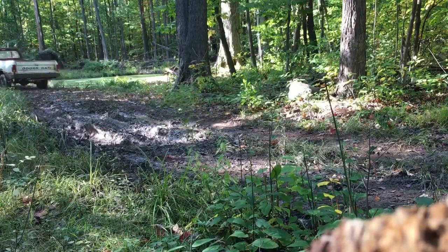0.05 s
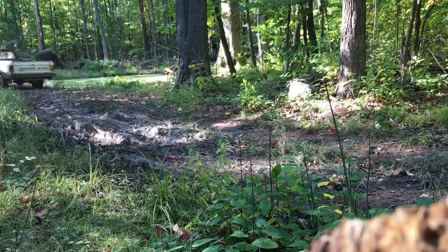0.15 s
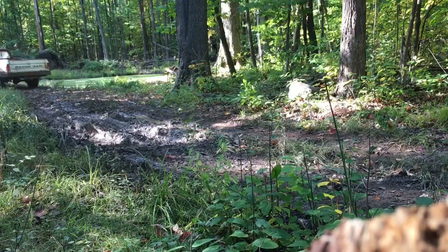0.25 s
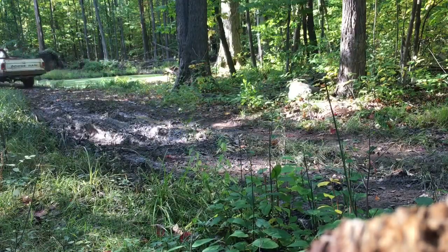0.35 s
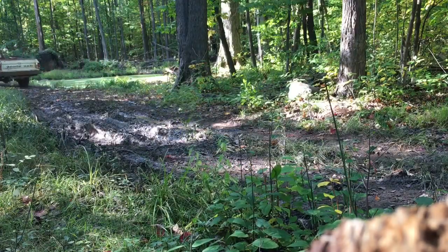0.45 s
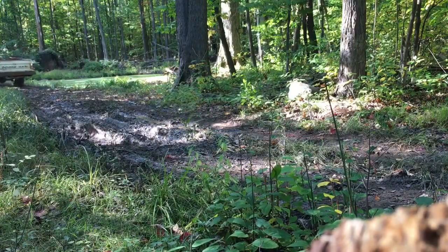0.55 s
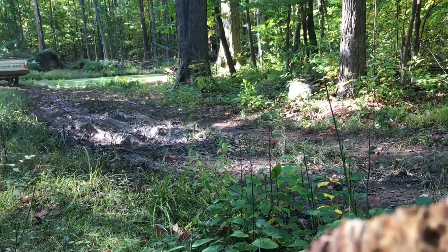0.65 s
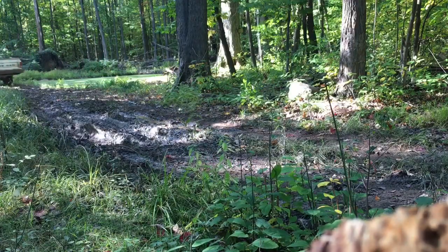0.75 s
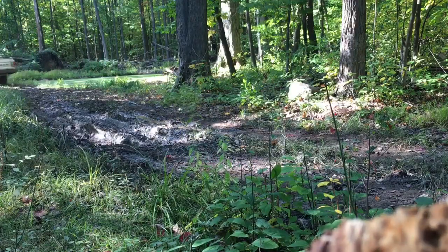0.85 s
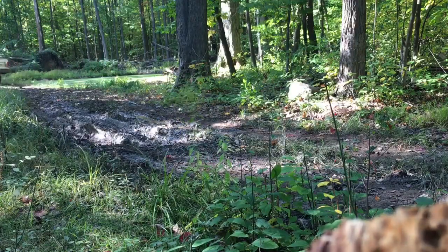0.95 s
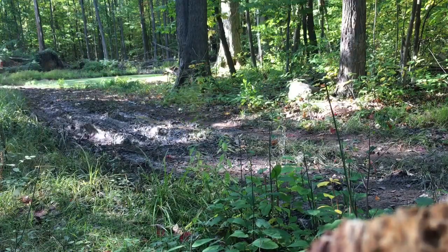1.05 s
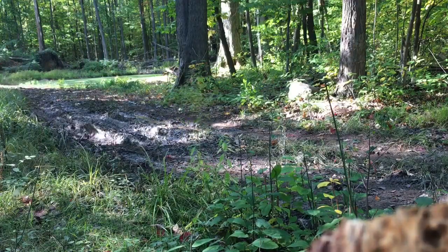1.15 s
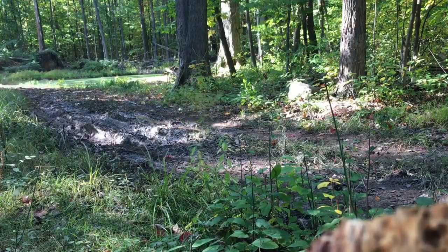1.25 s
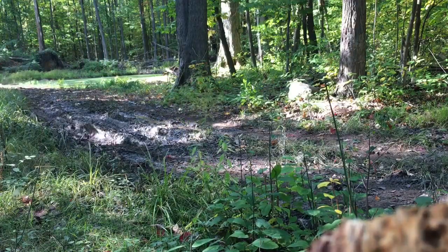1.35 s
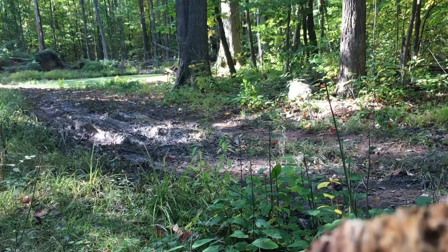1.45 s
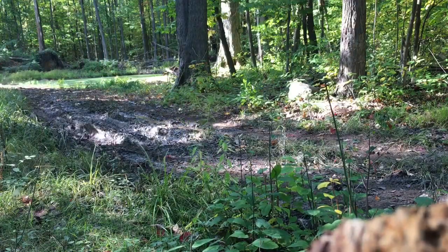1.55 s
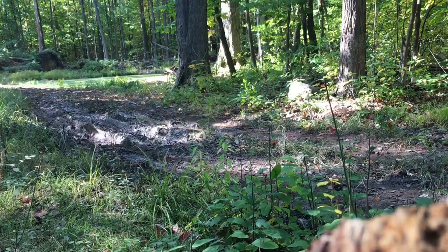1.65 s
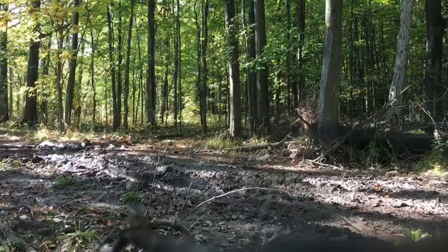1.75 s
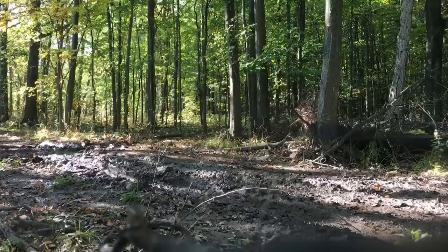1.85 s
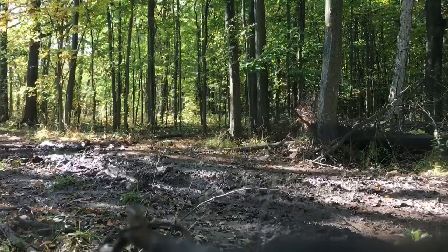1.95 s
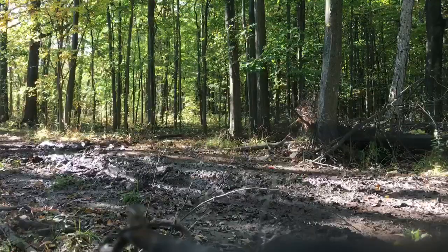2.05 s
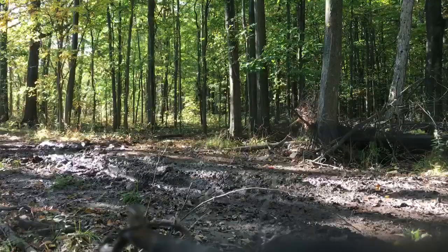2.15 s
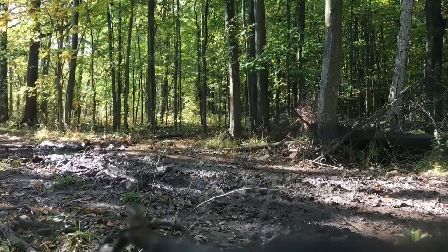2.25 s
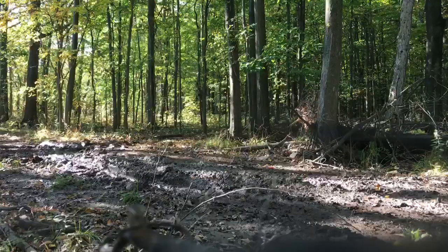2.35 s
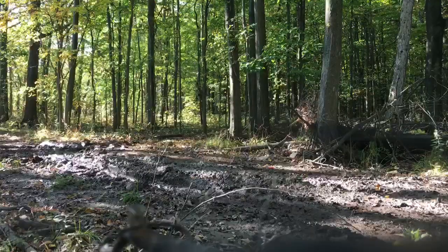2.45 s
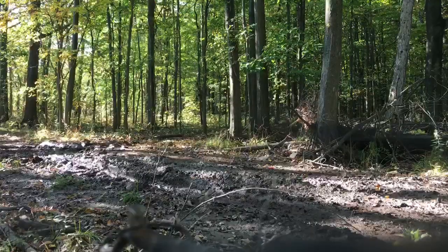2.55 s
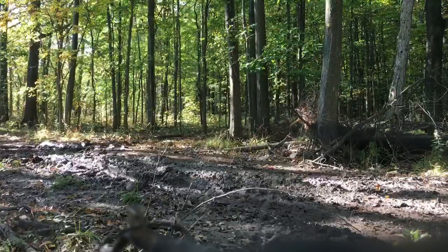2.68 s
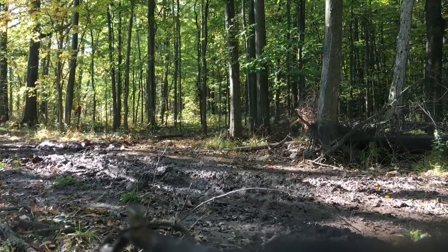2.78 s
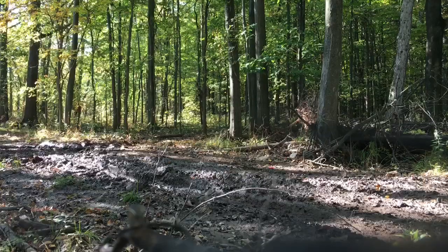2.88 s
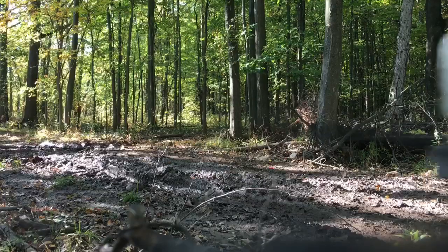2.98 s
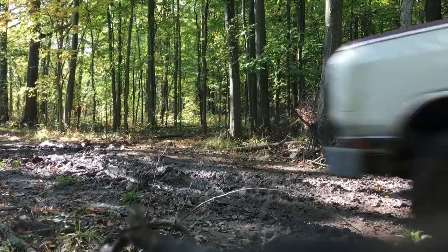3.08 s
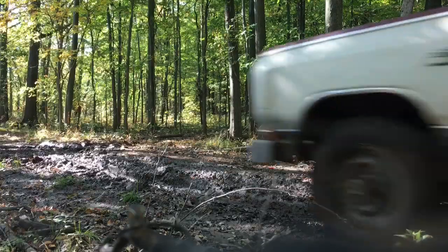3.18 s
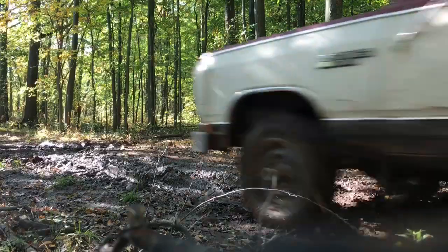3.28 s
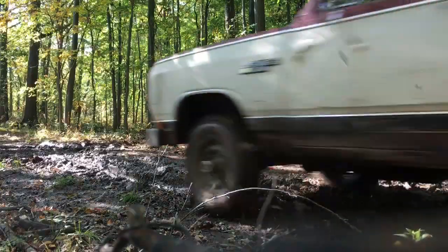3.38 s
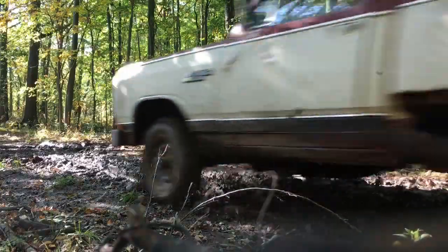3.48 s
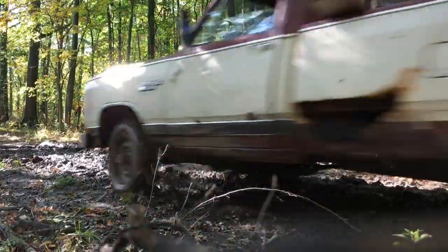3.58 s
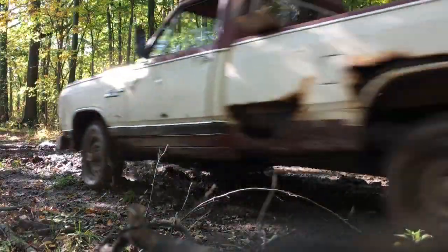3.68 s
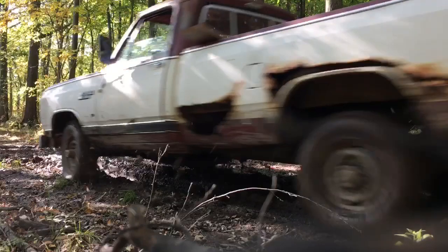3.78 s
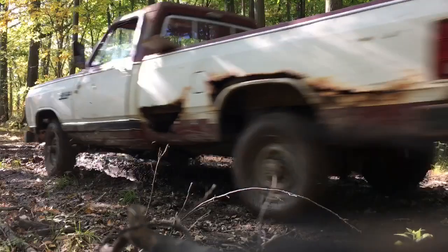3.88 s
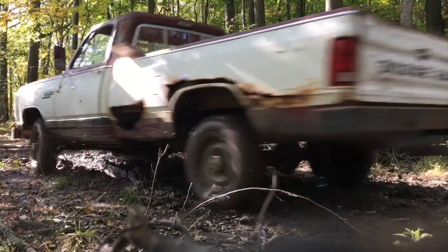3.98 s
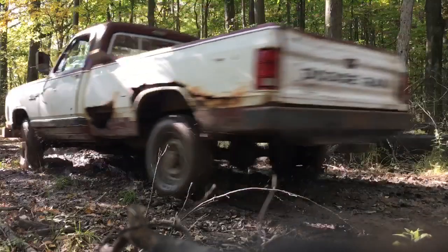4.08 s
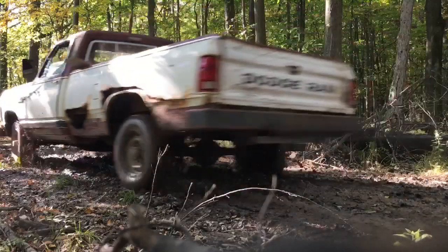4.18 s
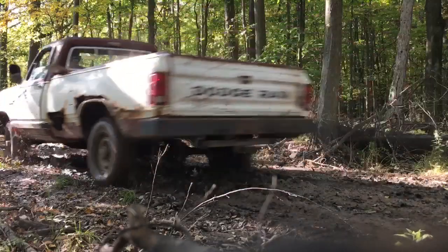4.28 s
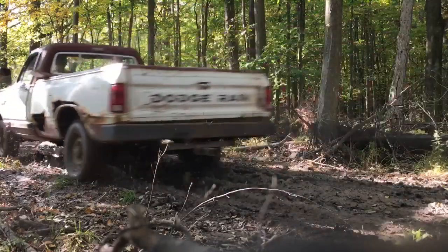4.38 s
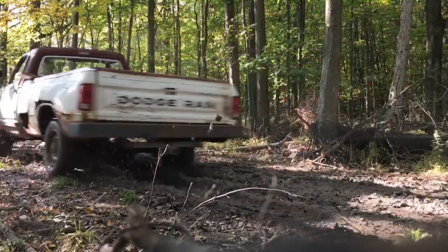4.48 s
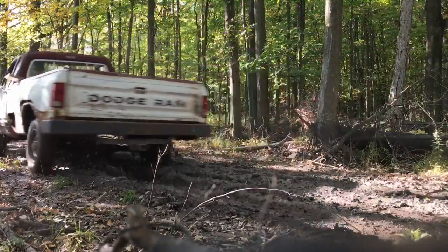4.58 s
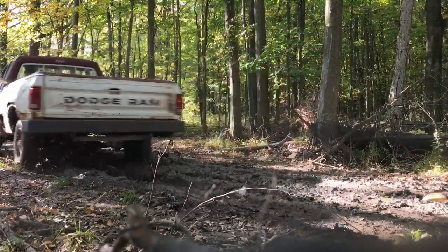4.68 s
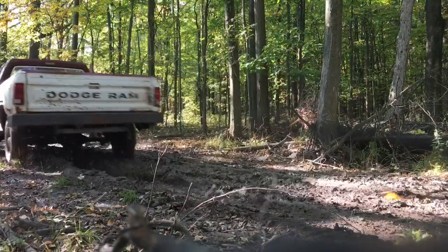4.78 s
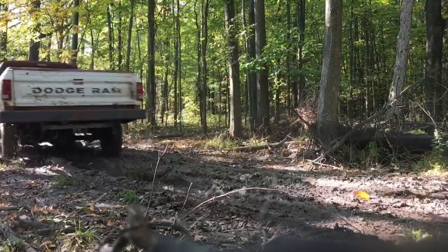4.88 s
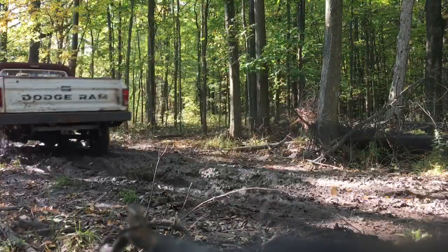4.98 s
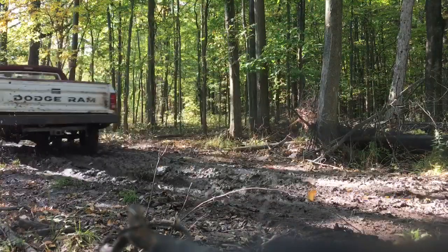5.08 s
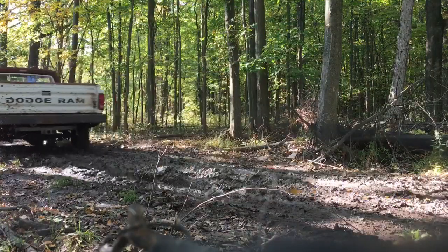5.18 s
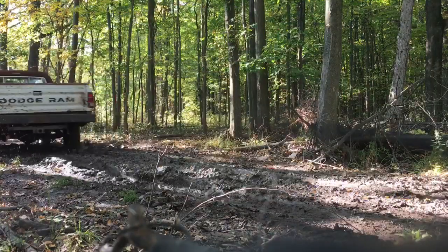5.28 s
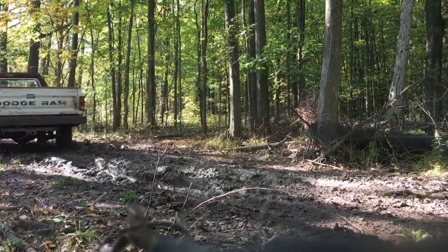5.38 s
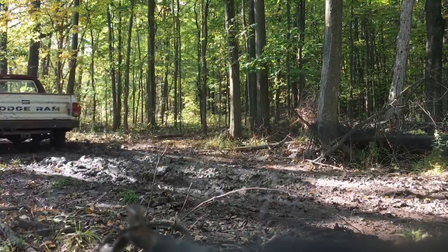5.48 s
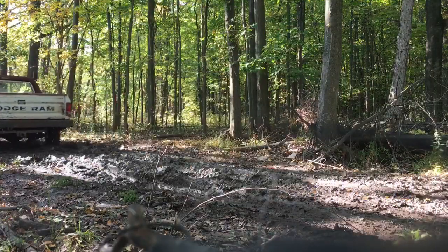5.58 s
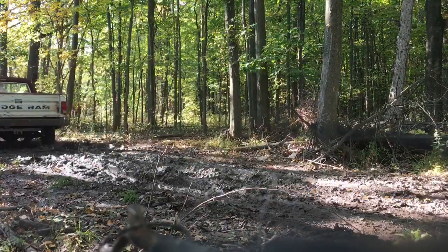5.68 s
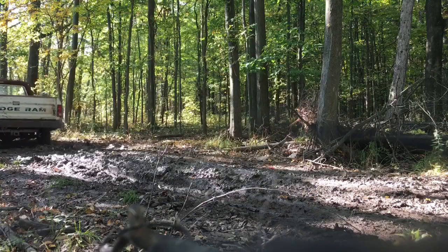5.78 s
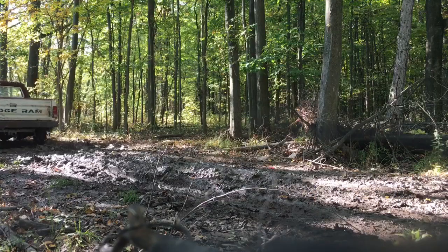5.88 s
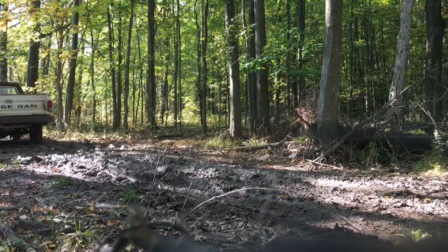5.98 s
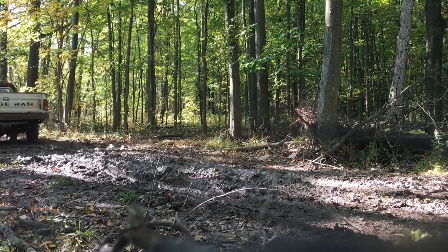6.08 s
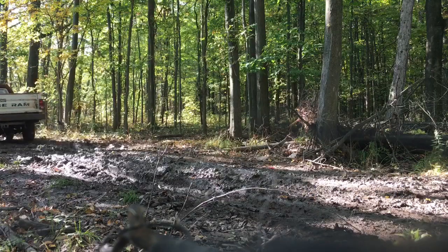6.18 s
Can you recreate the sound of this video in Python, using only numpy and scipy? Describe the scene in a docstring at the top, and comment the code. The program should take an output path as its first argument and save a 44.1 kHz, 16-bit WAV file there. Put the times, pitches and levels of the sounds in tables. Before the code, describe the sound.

Starting abruptly mid-rev, a distant old truck engine drones, surges and coasts down in soft woodland air. After a tiny dropout it is near, steady and throbbing, and grows quickly into a loud close pass with broad airy rush and puffing exhaust leak. The brightness falls away as it leaves, revving high and buzzing, with a short stumble near the end. Small knocks, mud pops and snapping twigs; fixed single microphone close to the ground.

```python
"""A muddy woodland track, along which an old V8 pickup churns.
Far off, its revs surge and coast; after a short dropout it draws near, passes close and pulls away.
The exhaust lopes on harmonics of the engine cycle over a noisy burble, and a leaking manifold spits in puffs.
Shaped noise makes the rush of fan and engine bay, sparse pops the crackling mud,
and short noise bursts the knocks and snapping twigs; soft noise is the wash of the woods."""
import sys
import numpy as np
from scipy import signal
from scipy.fft import rfft, irfft, next_fast_len
from scipy.io import wavfile
from scipy.ndimage import uniform_filter1d

SR = 44100
rng = np.random.default_rng(int(sys.argv[2]) if len(sys.argv) > 2 else 0)


def dump(signal):
    """Clip the signal to [-1, 1] and save it as 16-bit WAV at the path in sys.argv[1]."""
    limited = np.clip(np.atleast_2d(signal).T, -1, 1)
    pcm = np.round(limited * 32767).astype(np.int16)
    wavfile.write(sys.argv[1], SR, pcm)


N = 274724
TIME = np.arange(N) / SR

# Tailpipe tone from five sides. Each row: multiple of the engine cycle, then relative level in dB
# far off, nearing, beside, leaving and easing off.
TAILPIPE_ORDERS = [(2, -39, -37, -24, -11.5, -14), (3, -23, -22, -1.5, 0.5, -3),
                   (4, -21, -15, -12, -7.5, -2.5), (5, -11, 2.5, -4, -6.5, -3.5),
                   (6, -20, -23, -17, -3, -0.5), (7, -24, -19, -25, -20, -16), (8, 0, -2, 0, -6, 0),
                   (9, -20, -19, -26, -17.5, -13), (10, -17, -15, -25, -12, -12.5),
                   (11, -12, -14, -5, -8, -5), (12, -22, -28, -19, -28, -14.5),
                   (13, -12.5, -11, -5.5, -13, -9), (14, -26, -24, -20, -23, -23),
                   (15, -33, -16, -29, -29, -34), (16, -29.5, -23, -10, -27, -26),
                   (17, -34, -23, -29, -22, -28), (18, -40, -22, -25, -31, -33),
                   (19, -28, -21, -16, -30, -17), (20, -40, -29, -33, -28, -24),
                   (21, -38, -24, -25, -36, -23), (22, -41, -29, -36, -25, -37),
                   (23, -40, -33, -35, -35, -36), (24, -33, -27, -29, -33, -34)]
# Which of those sides is heard. Each row: time in seconds, side 0-4 in the order above.
SIDE_HEARD = [(.18, 4), (.25, 0), (.45, 0), (.53, 4), (.6, 4), (.68, 0), (1.69, 0), (1.71, 1), (3.05, 1),
              (3.5, 2), (3.85, 2), (4.25, 3), (5.7, 3), (5.9, 4)]
# Multiples that hold firm; the ones between them waver more.
FIRM_ORDERS = (3, 5, 8, 11, 13, 16)
# Cylinders of the leaking bank. Each row: place in the engine cycle 0-1, relative strength of the spit.
LEAKING_BANK = [(.02, .15), (.225, 1.0), (.6, .95), (.865, .85)]
# How directly the leak is heard. Each row: time in seconds, share 0-1.
LEAK_IN_VIEW = [(0, .2), (1.7, .1), (2.2, .25), (2.45, .75), (3.3, .75), (3.7, .5), (4.1, .25), (6.2, .2)]
# How open the front wheel arch lies to the listener. Each row: time in seconds, share 0-1.
ARCH_OPENNESS = [(2.7, .02), (3.15, .12), (3.35, .42), (3.7, .6), (3.82, .25), (4.1, .03)]

# Noise colours. Each row: frequency in Hz, relative level in dB per Hz.
BURBLE_COLOUR = [(20, -42), (38, -22), (58, -3), (90, -3), (150, 0.5), (210, -4.5), (300, -13.5),
                 (420, -21), (700, -40.5), (1500, -77)]
FAN_COLOUR = [(150, -19.5), (340, 2), (450, 1), (520, -2.5), (640, 1), (760, -1), (890, 1.5), (1080, -1.5),
              (1300, -4.5), (1600, -15), (3000, -42)]
# Fan roar from far off; each row as above.
FAR_FAN_COLOUR = [(200, -10), (340, 2), (500, 1.5), (620, -.5), (780, -5), (1000, -8), (1300, -8),
                  (1700, -14), (3000, -45)]
# Engine bay heard from the front, then from the rear; each row as above.
BAY_FRONT_COLOUR = [(900, -30), (1350, -6), (1540, 0), (1750, -1), (1950, -5.5), (2320, 0), (2650, -4),
                    (2900, -2), (3350, -4), (3650, -4), (4050, -7.5), (4800, -8.5), (5600, -15),
                    (8000, -55)]
BAY_REAR_COLOUR = [(900, -34), (1350, -3), (1600, 2), (2000, -2), (2300, -0.5), (2700, -1.5), (3100, -1),
                   (3700, -3), (4100, -6.5), (4900, -10), (5600, -17.5), (8000, -57)]
# Manifold hiss and still forest; each row as above.
HISS_COLOUR = [(3500, -42), (4900, -6), (5500, -1.5), (6500, -2), (7500, -6), (8900, -5), (9900, -8),
               (10450, -14), (11300, -8), (13000, -12.5), (15700, -15.5)]
FOREST_COLOUR = [(30, 0), (100, 6), (400, 2), (800, -2), (1600, -5), (3000, -11), (5000, -17), (8000, -26),
                 (15000, -41)]
# Soft ground swallows the distant upper exhaust. Each row: frequency in Hz, gain in dB.
GROUND_RESPONSE = [(30, -5), (60, 0), (200, .6), (270, -1), (330, -1), (420, -3.5), (550, -3), (900, 0)]
# Resonances under the bonnet. Each row: frequency in Hz, width in Hz, relative level in dB.
BONNET_RINGS = [(875, 55, -6), (2153, 90, -3), (2342, 90, 1), (2518, 70, -1), (2850, 200, 0),
                (3200, 250, -4), (3620, 150, -3.5), (4600, 200, -10)]
# The firing note booms on pipe resonances. Each row: frequency in Hz, half width in Hz, boost in dB.
PIPE_BOOMS = [(135.6, 3, 6.3), (171, 4.5, 3.5)]

# Body knocks and clods. Each row: start in seconds, level in dB, centre of the ring in Hz,
# time to die by 60 dB in seconds.
KNOCKS = [(.075, -29, 400, .45), (.13, -31, 1100, .25), (.283, -33, 2600, .12), (.79, -42, 600, .2),
          (3.755, -24, 2800, .25), (4.428, -24, 2100, .04), (4.96, -32, 1000, .2), (5.6, -19, 150, .3),
          (5.812, -27, 560, .35), (6.09, -32, 1100, .14)]
# Snapping twigs. Each row: start in seconds, relative level in dB.
TWIG_SNAPS = [(0.2714, -35), (0.844, -40), (2.3396, -23.5), (4.9127, -30), (5.0794, -29), (5.2144, -29),
              (5.8127, -31), (5.9279, -27), (6.0751, -27)]

# Crankshaft speed far off, then on the way past. Each row: time in seconds, revolutions per minute.
SPEED_FAR = [(0.0, 2149), (0.13, 1970), (0.17, 1976), (0.21, 2415), (0.4, 2411), (0.58, 2416), (0.69, 2268),
             (0.76, 2106), (0.85, 2023), (1.12, 2178), (1.23, 1884), (1.42, 1674), (1.68, 1534)]
SPEED_NEAR = [(1.72, 1824), (1.89, 1765), (2.12, 1862), (2.5, 1820), (2.91, 2007), (3.2, 2079),
              (3.65, 2470), (3.97, 2830), (4.15, 2876), (4.65, 2953), (4.8, 2892), (4.93, 3000),
              (5.16, 2939), (5.43, 2987), (5.68, 2836), (5.87, 2581), (6.0, 2518), (6.23, 2701)]
# Presses of the pedal far off. Each row: start in seconds, release in seconds, depth 0-1.
PEDAL_PRESSES = [(-.2, .2, .85), (.21, .62, 1.0), (.85, 1.05, .95)]
# The throttle snaps shut and the exhaust falters. Each row: time in seconds, depth in dB, half width in seconds.
THROTTLE_LIFTS = [(.695, 10, .022), (.82, 3, .02), (1.15, 5.5, .032), (1.668, 6, .03)]
# The tyres dig into soft mud. Each row: start in seconds, end in seconds, extra firing note in dB,
# extra roar and rush in dB.
MUD_DIGS = [(.06, .12, 0, 5.5), (3.96, 4.02, 2.5, 2.5), (4.92, 5.6, 0, 3), (5.86, 5.93, 6.5, 1.5),
            (6.06, 6.2, 1.5, 3)]
# Bark and rush sink as the engine drops its revs: time in seconds, depth in dB, half width in seconds.
REV_LULL = (5.775, 3.5, .04)
# The firing splutters at the gear change: time in seconds, depth in dB, half width in seconds.
GEAR_STUMBLE = (5.76, 6, .05)
# Base layer levels far off. Each row: coasting in dB, gain at full throttle in dB,
# change while easing off in dB, gain in dB per rpm above cruising.
FAR_LEVELS = {"lope": (-38, 9.5, 3.5, -.001), "firing": (-28, 6, -5.5, .007),
              "bark": (-33.2, 3.6, .5, .0085), "burble": (-32, .5, 1.5, .003), "fan": (-53, 12, 0, .001),
              "bay": (-56, 14.5, .5, -.001), "hiss": (-66, 17.5, 2, -.002)}
# Base layer levels on the way past. Each row: before, beside and after in dB, arrival in seconds,
# swell time in seconds, start of leaving in seconds, fade time in seconds.
PASS_LEVELS = {"lope": (-21, -13.7, -19, 2.4, .28, 3.45, .25),
               "firing": (-23.8, -17.6, -29.5, 2.58, .22, 4.06, .06),
               "bark": (-25.5, -15.4, -29.2, 2.75, .27, 3.55, .55),
               "burble": (-28.8, -24.2, -25.2, 2.65, .1, 3.4, .2),
               "fan": (-37.5, -29.5, -36, 2.55, .12, 3.6, .15),
               "bay": (-39.2, -21, -39.5, 2.74, .16, 3.7, .26),
               "hiss": (-46.7, -28.3, -48.3, 2.53, .15, 3.55, .38)}

DROPOUT_S, EDGE_HZ, CRUISING_RPM = 1.699, 15730, 2000
PRESS_S, RELEASE_S = .018, .17  # time constants of the pedal
FAR_OFF = TIME < DROPOUT_S


def exhaust(cycles, uneven_db=.7, splutter_share=.5):
    """Tailpipe and burble, heard first over a long stretch of soft ground, then from close by."""
    falter_db = sum(bump(TIME, *lift) for lift in THROTTLE_LIFTS)
    stumble_db = bump(TIME, *GEAR_STUMBLE)
    # under load in the mud the strength of the firing keeps changing
    strength_db = uneven_db * ~FAR_OFF * drift(60)
    # in the stumble the tone sinks while the noise swells
    tone = tailpipe(cycles) * gain_of(-stumble_db)
    splutter = burble(cycles) * gain_of(splutter_share * stumble_db)
    pipe = (tone + splutter) * gain_of(strength_db - falter_db)
    return np.where(FAR_OFF, filtered(pipe, GROUND_RESPONSE), pipe)


def tailpipe(cycles, waver_db=.8, loose_waver_db=1.8, jitter_cycles=.0018, lag_cycles=.17,
             far_smear=.17, front_smear=.12, rear_smear=.03):
    """Orders of the engine cycle; the uneven beat of one bank sets their phases and makes the lope."""
    coarse_time = TIME[::128]
    orders, *sides = np.transpose(TAILPIPE_ORDERS)
    s, side = np.transpose(SIDE_HEARD)
    side_db = sum(np.outer(db, np.interp(coarse_time, s, side == k)) for k, db in enumerate(sides))
    size = gain_of(side_db)
    # order 8 is the firing note: lope below it, bark above it
    group = np.sign(orders - 8).astype(int) + 1
    for k, db in enumerate(exhaust_levels()):
        members = group == k
        size[members] *= gain_of(np.interp(coarse_time, TIME, db)) / np.linalg.norm(size[members], axis=0)
    firing_places = np.array([0, 2, 5, 7]) / 8  # one bank, in cycles
    turns = cycles + jitter_cycles * drift(70) - lag_cycles
    # many paths through the trees delay each order differently and smooth the distant pulses to a drone;
    # the pulses are sharpest once the pipe points at the listener
    near_smear = np.interp(TIME, [3.3, 4.3], [front_smear, rear_smear])
    smear = np.where(FAR_OFF, far_smear, near_smear)
    tone = np.zeros(N)
    for order, order_size in zip(orders, size):
        bank_sum = np.exp(-2j * np.pi * order * firing_places).sum()
        phase = np.angle(bank_sum + .01) - np.pi / 2 + smear * (order - 8) ** 2
        unsteady_db = (waver_db if order in FIRM_ORDERS else loose_waver_db) * drift(18)
        level = np.interp(TIME, coarse_time, order_size) * gain_of(unsteady_db)
        tone += level * np.cos(2 * np.pi * order * turns + phase)
    return -np.sqrt(2) * tone


def burble(cycles, near_db=-3.8, distant_db=-3.0, throb=.3):
    """Uneven burning roughens the exhaust between its orders: noise that throbs with the puffs."""
    gas = rng.standard_normal(N) * (1 + throb * spits(cycles))
    trim_db = np.where(FAR_OFF, distant_db, near_db)
    return colour(gas, BURBLE_COLOUR) * gain_of(layer_db("burble") + trim_db)


def spits(cycles, rise=.02, fall=.085):
    """Each cylinder of the leaking bank lets out a puff, no two alike; rise and fall are in cycles."""
    puffs = np.zeros(N)
    for place, strength in LEAKING_BANK:
        age = (cycles - place + rise) % 1
        puffs += strength * (1 - np.exp(-age / rise)) * np.exp(-age / fall)
    return evened(puffs * gain_of(1.2 * drift(45)))


def engine_rpm():
    """Speed of the crankshaft."""
    return follow(np.vstack([SPEED_FAR, SPEED_NEAR]))


def engine_hz():
    """Four-stroke cycles per second, two crank turns each."""
    return engine_rpm() / 60 / 2


def engine_cycles():
    """Running count of four-stroke cycles."""
    return np.cumsum(engine_hz()) / SR


def press(start, end):
    """A quick rise, a hold and a slow release, 0-1."""
    rise = 1 - np.exp(-np.maximum(TIME - start, 0) / PRESS_S)
    return rise * np.exp(-np.maximum(TIME - end, 0) / RELEASE_S)


def far_db(layer):
    """Far off, a layer's level follows the pedal and the engine speed."""
    coasting, full_gain, easing_change, per_rpm = FAR_LEVELS[layer]
    throttle = np.max([depth * press(start, end) for start, end, depth in PEDAL_PRESSES], axis=0)
    s, side = np.transpose(SIDE_HEARD)
    easing = np.interp(TIME, s, side == 4)
    speed_db = per_rpm * (engine_rpm() - CRUISING_RPM)
    return coasting + full_gain * throttle + easing_change * easing + speed_db


def passing_db(layer):
    """A layer swells as its part of the truck draws level, then fades, quickly at first."""
    before, beside, after, arrives, swell, leaves, fade = PASS_LEVELS[layer]
    nearness = 1 / (1 + np.exp((arrives - TIME) / swell))
    gone = np.maximum(TIME - leaves, 0)
    return before + (beside - before) * nearness + (after - beside) * gone / (gone + fade)


def layer_db(layer):
    """A layer's base level: far off until the dropout, then driving past."""
    return np.where(FAR_OFF, far_db(layer), passing_db(layer))


def exhaust_levels(bark_share=.3):
    """Levels in dB of the lope below the firing note, the note itself and the bark above it."""
    firing_hz = 8 * engine_hz()
    boom = sum(bump(firing_hz, hz, db, width) for hz, width, db in PIPE_BOOMS)
    load = sum(db * press(start, end) for start, end, db, _ in MUD_DIGS)
    bark = layer_db("bark") + bark_share * load - bump(TIME, *REV_LULL)
    return layer_db("lope"), layer_db("firing") + boom + load, bark


def noise_levels(bay_share=.7, hiss_share=.4):
    """Levels in dB of fan roar, engine bay rush and manifold hiss, lifted as the tyres dig in."""
    churn = sum(db * press(start, end) for start, end, _, db in MUD_DIGS)
    shares = (("fan", 1), ("bay", bay_share), ("hiss", hiss_share))
    return [layer_db(layer) + share * churn - bump(TIME, *REV_LULL) for layer, share in shares]


def truck_noise(cycles, fan_db=1.0, bay_db=.3, hiss_db=.87, far_hiss_db=-2.5, bay_pulse=.45,
                mud_share=.32, far_hz=6000, surge_db=.5):
    """Fan roar, engine bay rush and manifold hiss, throbbing with the leak and mixed with mud spray."""
    fan, bay, hiss = map(gain_of, noise_levels())
    leak, puffs = follow(LEAK_IN_VIEW), spits(cycles)

    def air(pulse, patch_db):
        """Turbulence, partly gated by the puffs, with mud pops in it."""
        share = pulse * leak
        rushing = np.sqrt(1 - share + share * puffs ** 2) * patchy(patch_db)
        return (rushing + mud_share * crackle(450, 3.3)) * gain_of(surge_db * drift(40))

    blades = air(.25, 1.9)
    roar = np.where(FAR_OFF, gain_of(1.8) * colour(blades, FAR_FAN_COLOUR), colour(blades, FAN_COLOUR))
    # the body hides the engine bay once the truck has gone by
    front = np.interp(TIME, [1.65, 1.75, 3.7, 4.15], [.45, .95, .95, .03])
    draught = air(bay_pulse, 2.5)
    rush = front * colour(draught, BAY_FRONT_COLOUR) + (1 - front) * colour(draught, BAY_REAR_COLOUR)
    arch = follow(ARCH_OPENNESS)
    ringing = bonnet(air(bay_pulse, 2.5) + .75 * crackle(160, 3.0))
    rush = np.sqrt(1 - arch) * rush + np.sqrt(arch) * ringing
    # distance through the trees dulls the hiss
    jet = colour(air(1.0, 2.2), HISS_COLOUR)
    softened = signal.lfilter(*signal.butter(1, far_hz, fs=SR), jet)
    dull = gain_of(far_hiss_db) * evened(softened)
    near = np.interp(TIME, [1.65, 1.8, 2.45], [.05, .3, .98])
    return (gain_of(fan_db) * fan * roar + gain_of(bay_db) * bay * rush
            + gain_of(hiss_db) * hiss * (near * jet + (1 - near) * dull))


def bonnet(x):
    """The cavity and panels of the engine bay ring in the draught."""
    rings = 0
    for hz, width, db in BONNET_RINGS:
        rings += gain_of(db) * evened(signal.lfilter(*signal.iirpeak(hz, hz / width, SR), x))
    return evened(rings)


def patchy(patch_db):
    """Turbulent noise whose colour shifts in brief patches."""
    spectrum = signal.stft(rng.standard_normal(N), nperseg=512)[2]
    field = rng.standard_normal(spectrum.shape)
    field = uniform_filter1d(uniform_filter1d(field, size=3, axis=0), size=6, axis=1)
    return evened(signal.istft(spectrum * gain_of(patch_db * evened(field)))[1][:N])


def crackle(per_s, spread_db):
    """Sparse small pops of wet mud and leaves: noise bursts of random size that die at once."""
    size = gain_of(spread_db * np.minimum(rng.exponential(1, N), 4))
    size = size * (rng.random(N) < per_s / SR)
    power = signal.lfilter([1], [1, -np.exp(-1 / (.0007 * SR))], size ** 2)
    return evened(np.sqrt(power) * rng.standard_normal(N))


def knocks():
    """The body and the mud take dull, noisy blows: bursts of band-limited noise."""
    out, t = np.zeros(N), TIME[:SR // 3]
    for s, db, hz, t60 in KNOCKS:
        band = signal.butter(2, [hz * .55, hz * 1.5], "band", fs=SR, output="sos")
        body = signal.sosfilt(band, rng.standard_normal(len(t)))
        add(out, s, evened(body) * gain_of(db - 60 * t / t60) * (1 - np.exp(-t / .002)))
    return out


def twigs(level_db=-5.0, t60=.04):
    """Short bright snaps under the tyres: noise bursts with the lows removed."""
    out, t = np.zeros(N), TIME[:SR // 8]
    for s, db in TWIG_SNAPS:
        add(out, s, gain_of(db + level_db - 60 * t / t60) * rng.standard_normal(len(t)))
    return signal.sosfilt(signal.butter(1, [4500, 12000], "band", fs=SR, output="sos"), out)


def forest(level_db=-52):
    """The soft wash of the woods behind everything."""
    return gain_of(level_db) * colour(rng.standard_normal(N), FOREST_COLOUR)


def gain_of(db):
    """Amplitude factor of a level in dB."""
    return 10 ** (np.asarray(db) / 20)


def evened(x):
    """Brings x to unit power."""
    return x / np.sqrt(np.mean(x ** 2) + 1e-20)


def follow(rows):
    """A curve of (seconds, value) drawn out over the whole sound."""
    s, value = np.transpose(rows)
    return np.interp(TIME, s, value)


def bump(x, centre, height, width):
    """A bell-shaped rise around centre."""
    return height * np.exp(-((x - centre) / width) ** 2)


def drift(per_s):
    """Smooth random wander of unit size, with per_s turning points a second to draw on."""
    knots = rng.standard_normal(4096)
    wander = np.interp(TIME * per_s, np.arange(len(knots)), knots)
    return evened(uniform_filter1d(wander, int(SR / per_s / 2) + 1))


def filtered(x, points):
    """Passes x through a response given as (Hz, dB)."""
    size = next_fast_len(N + 4096)
    f, db = np.transpose(points)
    shape = np.interp(np.log(np.fft.rfftfreq(size, 1 / SR) + 1), np.log(f), db)
    return irfft(rfft(x, size) * gain_of(shape), size)[:N]


def colour(x, points):
    """Shapes x by a spectrum, at unit power."""
    return evened(filtered(x, points))


def add(mix, s, sound):
    """Lays a sound into the mix at s seconds."""
    part = mix[max(round(s * SR), 0):][:len(sound)]
    part += sound[:len(part)]


def scene():
    """The truck, its blows and snaps, and the woods, in one channel."""
    cycles = engine_cycles()
    return (exhaust(cycles) + truck_noise(cycles) + knocks() + twigs() + forest())[None]


def record(dry, fade_s=.04, return_s=.028):
    """The sound dips to nothing and swiftly returns; the highest peaks are rounded; then the treble is cut."""
    gap = np.maximum((DROPOUT_S - TIME) / fade_s, (TIME - DROPOUT_S) / return_s).clip(0, 1) ** 1.5
    rounded = dry / (1 + (dry / .98) ** 8) ** (1 / 8)
    treble_cut = signal.firwin(1023, EDGE_HZ, window=("kaiser", 9), fs=SR)
    return signal.oaconvolve(rounded * gap, treble_cut[None], "same")


dry = scene()
out = record(dry)
dump(out)
```